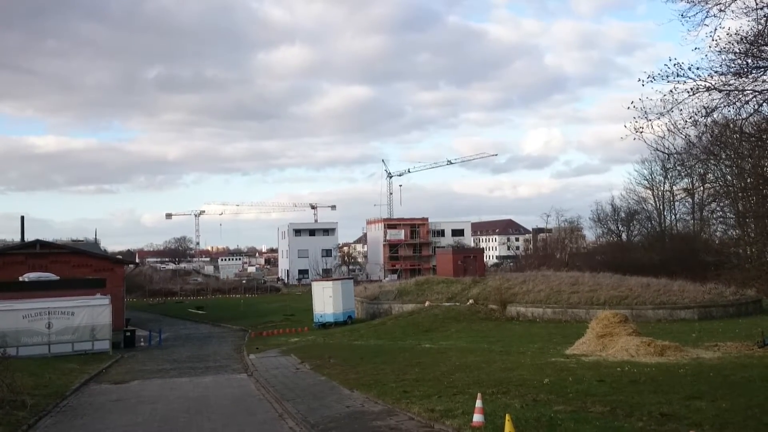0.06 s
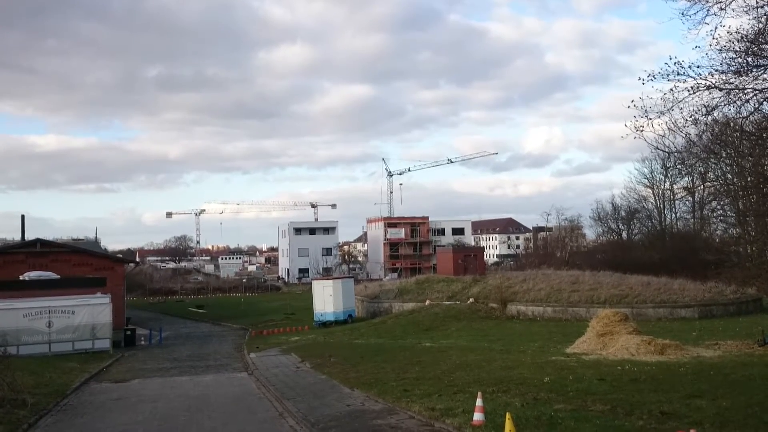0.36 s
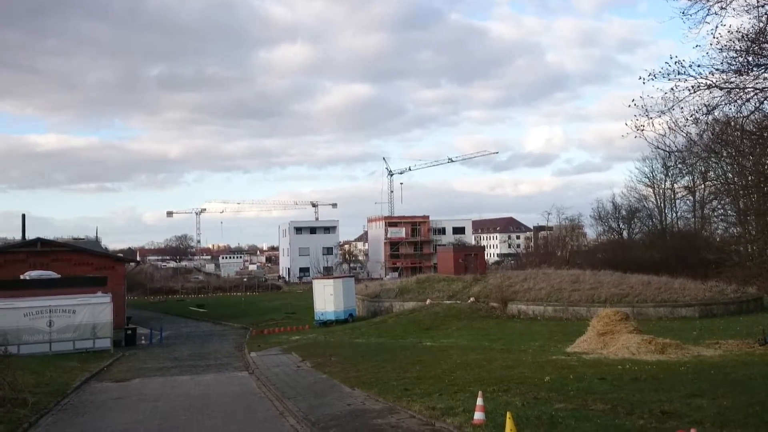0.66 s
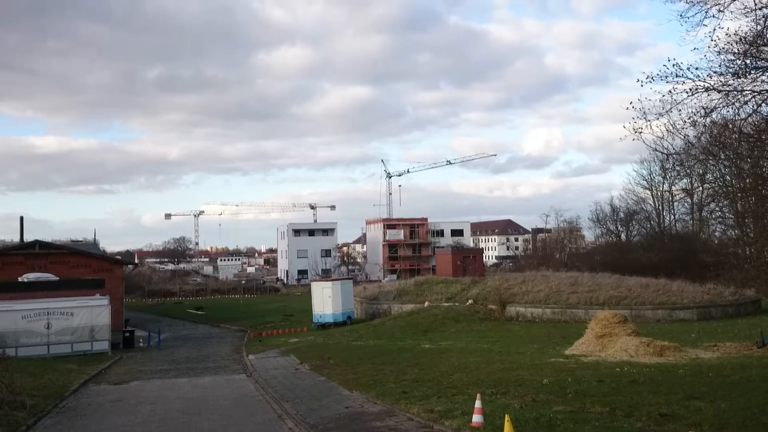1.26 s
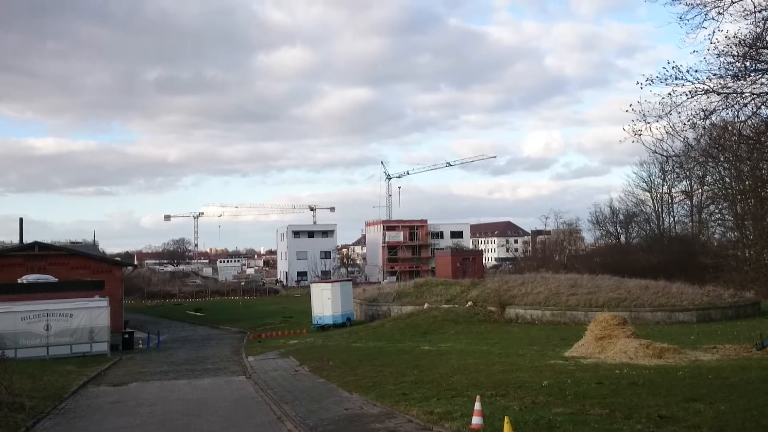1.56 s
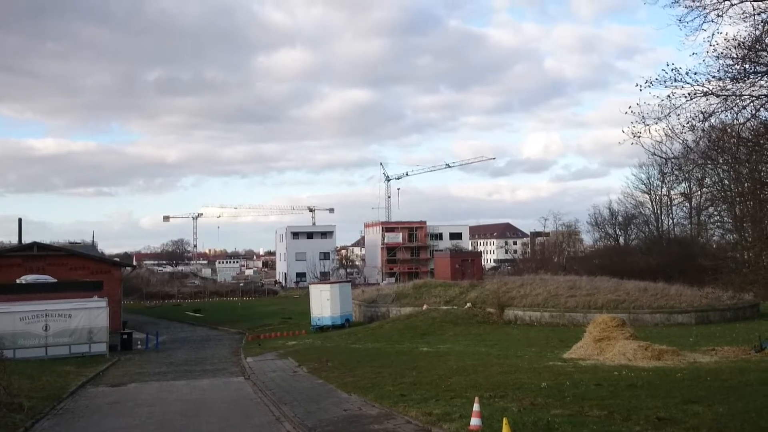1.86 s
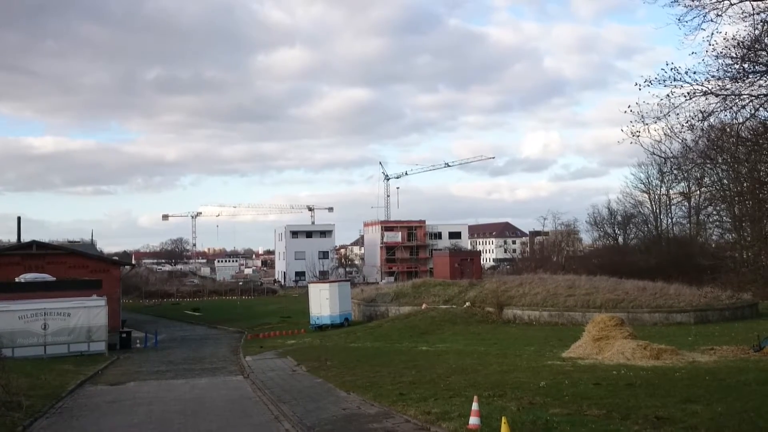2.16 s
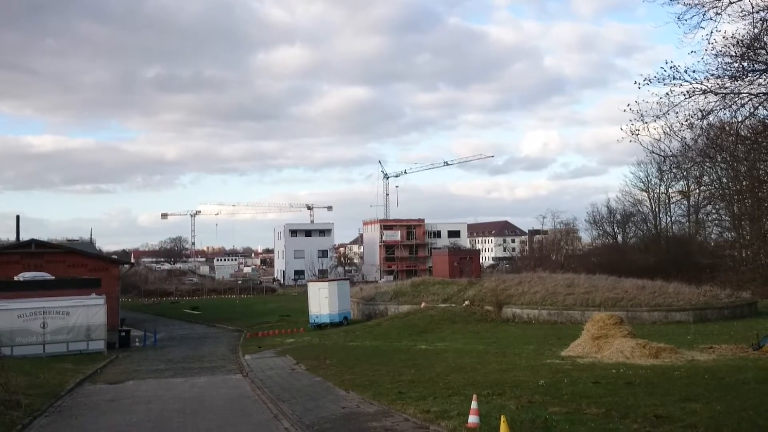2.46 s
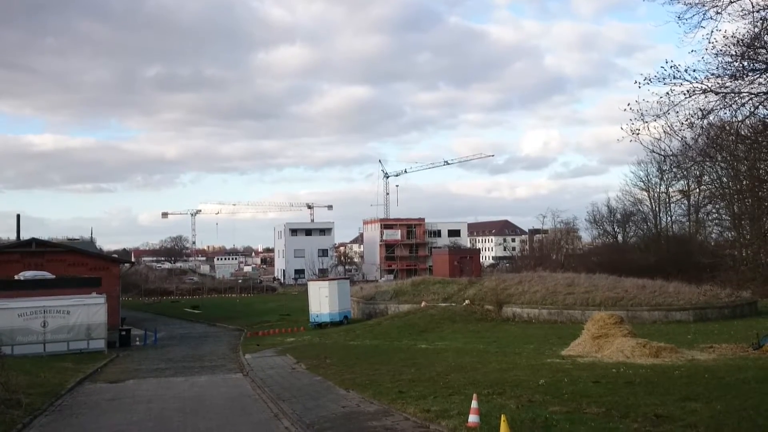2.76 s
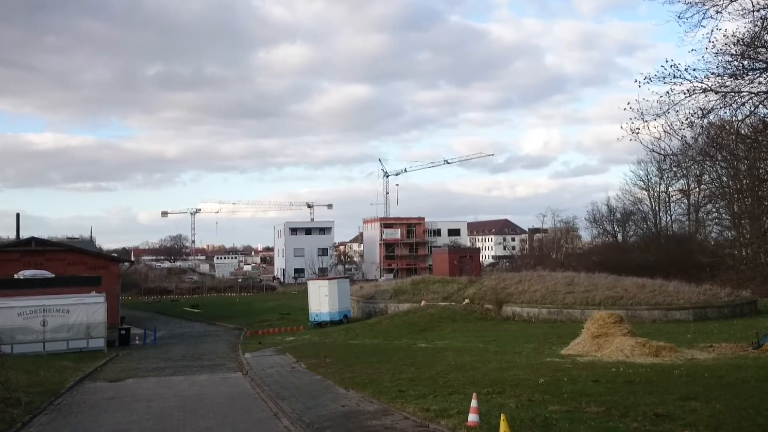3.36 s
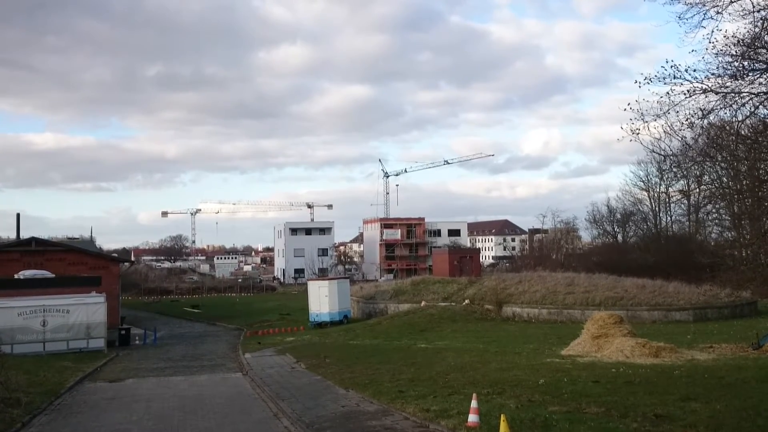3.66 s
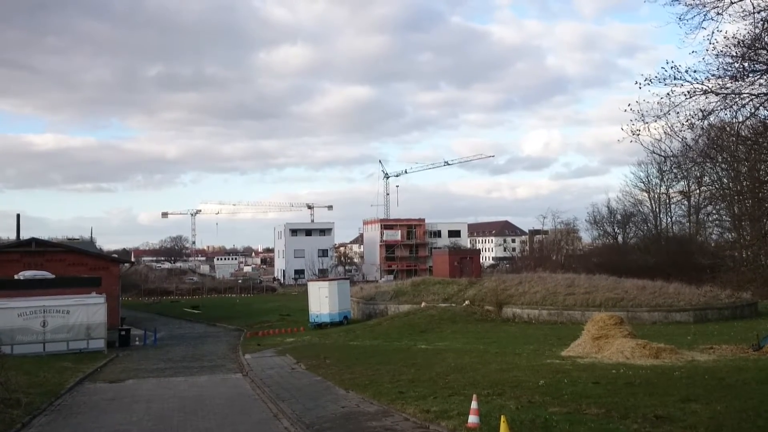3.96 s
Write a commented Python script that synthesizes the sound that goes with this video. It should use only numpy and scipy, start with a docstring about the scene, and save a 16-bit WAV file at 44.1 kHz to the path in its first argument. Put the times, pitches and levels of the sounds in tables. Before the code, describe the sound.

Small birds twitter over gusty wind on the microphone and distant traffic hum.

```python
"""A flock of small birds twitters in bare trees on the right of an open field, then falls quiet.
Hundreds of short falling chirps overlap, blurred by scattering from the trunks; a few nearer chirps
and two whistled calls stand out. Turbulent gusts press on the microphone as rumble and thumps,
and the breeze hisses in the twigs. Behind them the traffic of a town hums, a far diesel engine
drones, and one vehicle whines and recedes."""
import sys
import numpy as np
from scipy import signal
from scipy.fft import rfft, irfft
from scipy.io import wavfile

SR = 44100
rng = np.random.default_rng(int(sys.argv[2]) if len(sys.argv) > 2 else 0)


def generate_wav(sig):
    """Save sig (samples, or channels by samples) to the path in sys.argv[1] as 16-bit PCM at SR."""
    pcm = np.round(np.clip(np.atleast_2d(sig).T, -1, 1) * 32767).astype(np.int16)
    wavfile.write(sys.argv[1], SR, pcm)


N = 176400
T = np.arange(N) / SR
HZ = np.maximum(np.fft.rfftfreq(N, 1 / SR), 1)


def from_db(db):
    """Amplitude grows tenfold for every 20 decibels."""
    return 10 ** (np.asarray(db) / 20)


def rms_one(x):
    """Division by the root mean square gives unit power."""
    return x / np.sqrt(np.mean(x ** 2) + 1e-20)


def in_time(rows):
    """Linear interpolation in time gives each column a value at every sample."""
    time_s, *columns = np.transpose(rows)
    return [np.interp(T, time_s, column) for column in columns]


def at_hz(points):
    """Interpolation over log frequency gives a value at every spectral line."""
    hz, value = np.transpose(points)
    return np.interp(np.log(HZ), np.log(hz), value)


def pan(balance_db):
    """Constant-power panning; balance is the left level minus the right."""
    gains = from_db(np.array([[.5], [-.5]]) * balance_db)
    return gains / np.sqrt(np.mean(gains ** 2, axis=0))


def drift(rate_hz):
    """Low-pass filtered noise gives a random fluctuation of rms 1."""
    white = rfft(rng.standard_normal(N))
    return rms_one(irfft(white * (HZ > 1) / (1 + (HZ / rate_hz) ** 2), N))


def noise(spectrum, correlation=0, balance_db=0):
    """Coloured stereo noise of rms 1: the ratio of mid to side sets the left-right correlation."""
    mid, side = rfft(rng.standard_normal((2, N)))
    alike = np.clip(correlation, -.95, .95)
    stereo = np.sqrt(1 + alike) * mid + np.sqrt(1 - alike) * side * [[1], [-1]]
    return rms_one(irfft(stereo * from_db(at_hz(spectrum)) * pan(balance_db) * (HZ > 3), N))


def tone(hz):
    """Phase is the integral of frequency: a gliding sine of rms 1."""
    return np.sqrt(2) * np.sin(2 * np.pi * np.cumsum(hz) / SR)


# wash of far roads: frequency_hz, relative_density_db
TRAFFIC_SPECTRUM = [(25, 9), (60, 9), (100, 10), (180, 2), (250, 0.5), (330, -2.5), (550, -6), (800, -6.5),
                    (1000, -2.5), (1300, -7), (1800, -6), (2300, -12), (2700, -18), (3600, -19),
                    (4700, -17), (5600, -20.5), (6250, -18.5), (7000, -27), (8500, -32.5), (10000, -42.5),
                    (15500, -44.5)]
# left-right balance of the traffic, including the microphones' colouring: frequency_hz, balance_db
TRAFFIC_BALANCE = [(60, -10), (250, 1.5), (420, -2), (700, 4.5), (1100, 5), (1800, 5.5), (2400, 3),
                   (3400, -6), (4600, -1.5), (6200, -17.5), (7000, 2), (7800, 10), (10000, -0.5)]
# left-right likeness of all road noise: frequency_hz, correlation
ROAD_CORRELATION = [(60, 1), (120, 1), (230, 1), (440, 0.84), (850, 0.059), (1660, -0.37), (3210, -0.16),
                    (6240, -0.22)]
# tyres swelling on a nearer street: time_s, level_db
TYRE_LEVEL = [(.3, -55), (1.4, -60), (1.7, -52), (2.2, -59.5), (2.9, -51), (4, -57.5)]
# colour of those tyres: frequency_hz, relative_density_db
TYRE_SPECTRUM = [(400, -5), (1600, 8.5), (4000, -30)]
# far diesel engine: harmonic_number, level_db
DRONE_PARTIALS = [(1, -47.5), (3, -62)]
# the engine draws nearer: time_s, gain_db
DRONE_GAIN = [(0, -2.5), (2.2, 0.5), (4, 1)]
DRONE_HZ, DRONE_WANDER, DRONE_ROUGHNESS = 134.55, 0.009, 0.29
TRAFFIC_DB = -43.5


def traffic():
    """Incoherent sources add to a broadband wash; an engine's periodic firing adds harmonics."""
    tyres_db, = in_time(TYRE_LEVEL)
    drone_db, = in_time(DRONE_GAIN)
    pitch_hz = DRONE_HZ * (1 + DRONE_WANDER * drift(3.2))
    drone = sum(from_db(level_db) * tone(harmonic * pitch_hz) * (1 + DRONE_ROUGHNESS * drift(9.3))
                for harmonic, level_db in DRONE_PARTIALS)
    correlation, balance_db = at_hz(ROAD_CORRELATION), at_hz(TRAFFIC_BALANCE)
    wash = from_db(TRAFFIC_DB) * noise(TRAFFIC_SPECTRUM, correlation, balance_db)
    tyres = from_db(tyres_db) * noise(TYRE_SPECTRUM, correlation, balance_db)
    return wash + tyres + from_db(drone_db) * drone


# road noise of the receding vehicle: time_s, relative_level_db
ROAD_LEVEL = [(0, -47.5), (.8, -50), (1.5, -51), (2.3, -54.5), (3, -61), (4, -73)]
# its colour: frequency_hz, relative_density_db
ROAD_SPECTRUM = [(60, -27), (250, 2), (450, -1.5), (700, -2.5), (850, -7.5), (1050, -8.5), (1500, -17),
                 (2400, -14), (3200, -28.5), (8000, -54)]
# its left-right balance: frequency_hz, balance_db
ROAD_BALANCE = [(300, 1.5), (1000, 1.5), (1700, -3.5), (2400, -18.5)]
# the vehicle's whine: time_s, pitch_hz, level_db
WHINE = [(0, 376, -52), (.45, 367, -54), (.8, 363.9, -43.5), (1.25, 359, -55.5), (1.6, 356, -49.5),
         (3, 350, -88)]
ROAD_GAIN_DB, WHINE_ROUGHNESS = 5, 0.25


def vehicle():
    """Level falls with distance: road noise fades and a whine sinks as the vehicle moves away."""
    road_db, = in_time(ROAD_LEVEL)
    pitch_hz, whine_db = in_time(WHINE)
    road = noise(ROAD_SPECTRUM, at_hz(ROAD_CORRELATION), at_hz(ROAD_BALANCE))
    whine = tone(pitch_hz + 2 * drift(2.7)) * (1 + WHINE_ROUGHNESS * drift(6))
    return from_db(road_db + ROAD_GAIN_DB) * road + from_db(whine_db) * whine


# hiss of the breeze in the twigs: time_s, level_db
HISS_LEVEL = [(0, -58.5), (.4, -57), (1.1, -61), (1.5, -61), (2.1, -65.5), (2.8, -69.5), (3.3, -84)]
# its colour: frequency_hz, relative_density_db
HISS_SPECTRUM = [(1500, -9), (3000, 8.5), (6000, 7), (7500, 5), (9600, -1), (10500, -10.5), (12100, -5),
                 (13000, -32), (15500, -41)]
# left-right colouring of the hiss by the microphones: frequency_hz, balance_db
HISS_BALANCE = [(3000, -1), (6200, -15), (7700, 4), (10500, -1), (12100, 15)]
HISS_FLICKER_DB = 1.5


def twigs():
    """Airflow past thin twigs makes high-frequency noise that dies away with the breeze."""
    level_db, = in_time(HISS_LEVEL)
    envelope = from_db(level_db + HISS_FLICKER_DB * drift(15))
    return envelope * noise(HISS_SPECTRUM, balance_db=at_hz(HISS_BALANCE))


# strength of the gusts: time_s, relative_level_db
GUST_LEVEL = [(0, -38.5), (.5, -35.5), (.76, -30.5), (.88, -35.5), (1.12, -30.5), (1.24, -36),
              (1.33, -31.5), (1.56, -30.5), (1.8, -33), (1.98, -31), (2.25, -40), (2.46, -34), (2.65, -37),
              (2.8, -37.5), (2.9, -43.5), (3.15, -40), (3.35, -42), (4, -44)]
# where they hit the microphone: time_s, balance_db
GUST_BALANCE = [(0, -6), (.5, -3), (.75, -5), (1.1, -4), (1.3, -6), (1.5, 0), (2, -9.5), (2.3, -2.5),
                (2.6, -8.5), (4, -7)]
# wind rumble: frequency_hz, relative_density_db
RUMBLE_SPECTRUM = [(8, 8), (24, -3), (45, 0), (70, -5.5), (100, -8), (150, -17), (230, -23.5), (350, -28.5),
                   (700, -45.5), (6000, -91)]
# higher flutter: frequency_hz, relative_density_db
FLUTTER_SPECTRUM = [(40, -42), (100, 7.5), (200, 4.5), (300, -15), (700, -19), (4000, -72)]
RUMBLE_GAIN_DB, FLUTTER_GAIN_DB, FLUTTER_GROWTH = 4.5, -18, 1.5
LUMPS_DB, LUMPS_HZ, WIND_CORRELATION = 2, 26, 0.35


def wind():
    """Turbulent pressure rumbles on each microphone port; a flutter grows faster in strong gusts."""
    gust_db, = in_time(GUST_LEVEL)
    balance_db, = in_time(GUST_BALANCE)
    lumps_db = LUMPS_DB * np.array([drift(LUMPS_HZ), drift(LUMPS_HZ)])
    rumble = from_db(gust_db + RUMBLE_GAIN_DB) * noise(RUMBLE_SPECTRUM, WIND_CORRELATION)
    flutter_db = gust_db.mean() + FLUTTER_GROWTH * (gust_db - gust_db.mean())
    flutter = from_db(flutter_db + FLUTTER_GAIN_DB) * noise(FLUTTER_SPECTRUM)
    return (rumble + flutter) * from_db(lumps_db) * pan(balance_db)


# single hard eddies: centre_s, rumble_level_db, balance_db
BUFFETS = [(0.659, -27.5, 11), (0.789, -30, 4), (1.06, -24, 20), (1.08, -27.5, 21), (1.108, -27, 8.5),
           (1.16, -28, 11), (1.477, -32, 11), (1.6, -33.5, -25)]
# their rumble: frequency_hz, relative_density_db
BUFFET_SPECTRUM = [(15, -13), (40, 3), (210, -6), (350, -24), (4000, -78)]
PUSH_HALF_WIDTH_S, BUFFET_HALF_WIDTH_S, PUSH_OVER_RUMBLE_DB = 0.0026, 0.013, 7.5


def buffets():
    """Each eddy gives the ports one sharp pressure pulse, wrapped in a short rumble."""
    out, rumble = 0, noise(BUFFET_SPECTRUM, WIND_CORRELATION)
    for centre_s, level_db, balance_db in BUFFETS:
        offset = (T - centre_s) / PUSH_HALF_WIDTH_S
        push = from_db(PUSH_OVER_RUMBLE_DB) * (1 - offset ** 2) * np.exp(-.5 * offset ** 2)
        burst = rumble * np.exp(-.5 * ((T - centre_s) / BUFFET_HALF_WIDTH_S) ** 2)
        out = out + from_db(level_db) * pan(balance_db) * (push + burst)
    return out


def trees(x, echo_db=-2, t60_s=0.42):
    """Scattering from the trunks adds an exponentially decaying tail, different in each ear."""
    tail = rng.standard_normal((2, SR)) * from_db(-60 * T[:SR] / t60_s)
    tail /= np.sqrt(np.sum(tail ** 2, axis=1, keepdims=True))
    echo = signal.fftconvolve(x[None], tail, axes=1)[:, :N]
    return (x + from_db(echo_db) * echo) / np.sqrt(1 + from_db(echo_db) ** 2)


# single bird calls: start_s, pitch_hz, onset_offset_hz, level_db, balance_db, waver_hz, fade_db_per_s
CALLS = [(.491, 6250, -900, -47, -12, 71, 112), (1.293, 5350, 600, -47, -21, 25, 33)]
CALL_S, CALL_EDGE_S, CALL_ROUGHNESS = 0.115, .014, .3
CALL_SLIDE_S, CALL_SAG_HZ_PER_S = 0.0071, 1360


def calls():
    """Frequency modulation of a pure tone: thin whistles slide onto a note, then sag and fade."""
    out = 0
    for start_s, pitch_hz, offset_hz, level_db, balance_db, waver_hz, fade_db_per_s in CALLS:
        age_s = np.maximum(T - start_s, 0)
        gate = np.clip(np.minimum(age_s, CALL_S - age_s) / CALL_EDGE_S, 0, 1)
        envelope = gate * from_db(-fade_db_per_s * age_s)
        glide_hz = pitch_hz + offset_hz * np.exp(-age_s / CALL_SLIDE_S) - CALL_SAG_HZ_PER_S * age_s
        whistle = tone(glide_hz + waver_hz * drift(136)) * (1 + CALL_ROUGHNESS * drift(50))
        out = out + from_db(level_db) * pan(balance_db) * trees(envelope * whistle, echo_db=-6)
    return out


# chirps of the nearest birds: centre_s, pitch_hz, level_db
NEAR_CHIRPS = [(.478, 4620, -40), (0.708, 4860, -51), (0.802, 4620, -44), (0.851, 4660, -43.5),
               (1.463, 4770, -47.5), (1.61, 4530, -46.5), (2.2, 4490, -51), (2.541, 4480, -50),
               (2.578, 5030, -49), (2.91, 4900, -50)]
CHIRP_S, NEAR_FALL_HZ = 0.01397, 202.6


def near_chirps():
    """Sound spreads less over a short path, so the falling chirps of closer birds stand out."""
    out = 0
    for centre_s, pitch_hz, level_db in NEAR_CHIRPS:
        sweep = np.clip((T - centre_s) / CHIRP_S, -.5, .5)
        out = out + from_db(level_db) * np.cos(np.pi * sweep) * tone(pitch_hz - NEAR_FALL_HZ * sweep)
    return pan(balance_db=-7) * trees(out)


def twitter(pitch_hz, per_s=520, fall_hz=335, scatter_hz=201, spread_db=3):
    """Random superposition of short falling chirps around a pitch, heard through the trees; rms 1."""
    out = np.zeros(N + SR)
    deviations = rng.standard_normal((int(per_s * N / SR), 5))
    for k, (late, high, long, loud, steep) in enumerate(deviations):
        start = int(np.clip((k + late) / per_s * SR, 0, N - 1))
        sweep = np.linspace(-.5, .5, int(CHIRP_S * SR * np.exp(0.303 * long)))
        glide_hz = pitch_hz[start] + scatter_hz * high - fall_hz * (1 + .5 * steep) * sweep
        envelope = from_db(spread_db * loud) * np.cos(np.pi * sweep)
        out[start:start + len(sweep)] += envelope * tone(glide_hz)
    return rms_one(trees(out[:N]))


# twittering of the flock: time_s, level_db, middle_pitch_hz, balance_db
FLOCK = [(0, -47, 4865, -11), (.22, -46, 4840, -7.5), (.65, -49, 4790, -13), (.82, -47.5, 4750, -14),
         (1.1, -55, 4665, -1.5), (1.4, -52, 4686, -8), (1.68, -51, 4620, -8), (2.0, -59, 4563, -6),
         (2.4, -58, 4587, -0.5), (2.9, -56, 4785, -9), (3.1, -59, 4510, -13), (3.3, -67.5, 4700, -3)]
# its merged higher notes: frequency_hz, relative_density_db
SHIMMER_SPECTRUM = [(3000, -31), (4200, -0.5), (5200, 0), (5700, -1), (6200, 2.5), (6700, -11), (7500, -30),
                    (10000, -43)]
SHIMMER_GAIN_DB, SHIMMER_PAN_DB = -4, -12


def flock():
    """Many independent voices overlap as twitter; their higher notes merge into a band of noise."""
    level_db, pitch_hz, balance_db = in_time(FLOCK)
    chirps = twitter(pitch_hz) * pan(balance_db)
    shimmer = noise(SHIMMER_SPECTRUM) * pan(balance_db + SHIMMER_PAN_DB)
    return from_db(level_db) * (chirps + from_db(SHIMMER_GAIN_DB) * shimmer)


def scene():
    """Superposition: the pressures from roads, wind and birds add at the microphone."""
    return traffic() + vehicle() + wind() + buffets() + twigs() + flock() + near_chirps() + calls()


CUTOFF_HZ = 15700


def record(dry):
    """Band limiting: an elliptic low-pass filter cuts the top treble steeply."""
    return signal.sosfilt(signal.ellip(10, .1, 80, CUTOFF_HZ, fs=SR, output="sos"), dry)


dry = scene()
out = record(dry)
generate_wav(out)
```